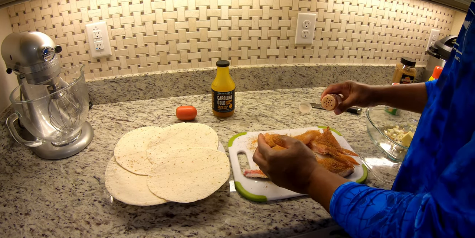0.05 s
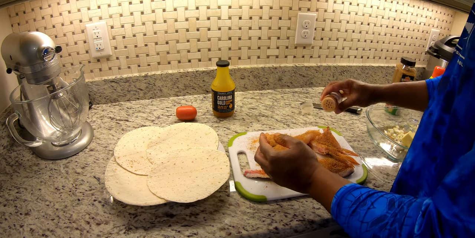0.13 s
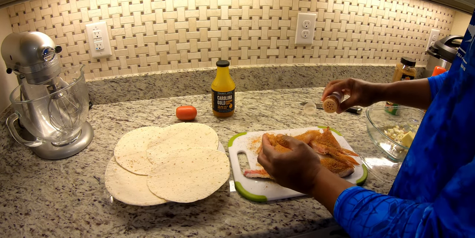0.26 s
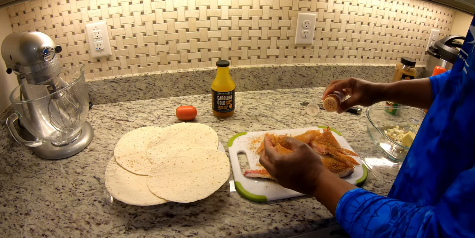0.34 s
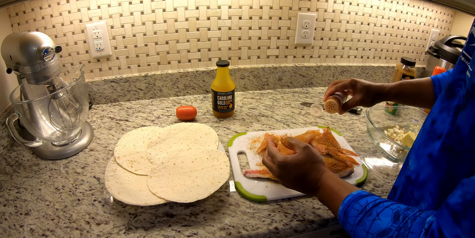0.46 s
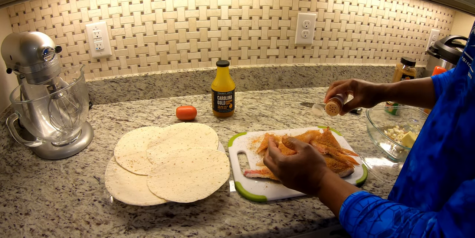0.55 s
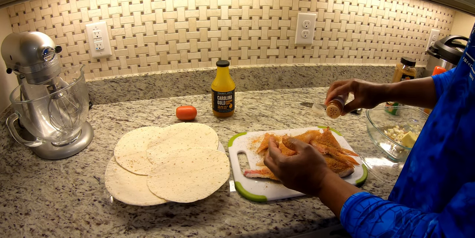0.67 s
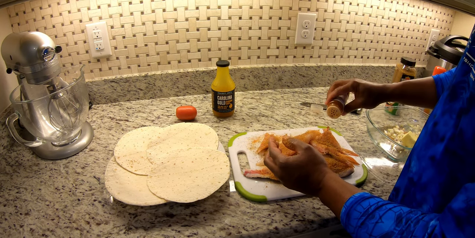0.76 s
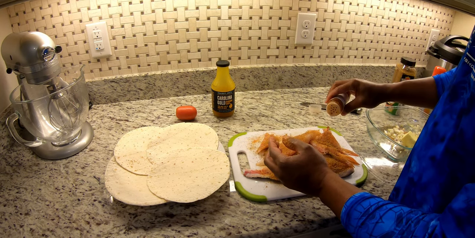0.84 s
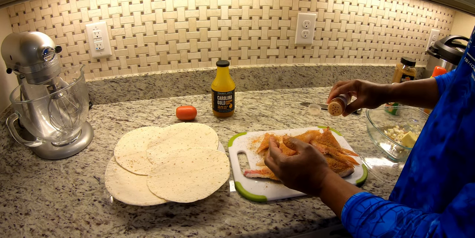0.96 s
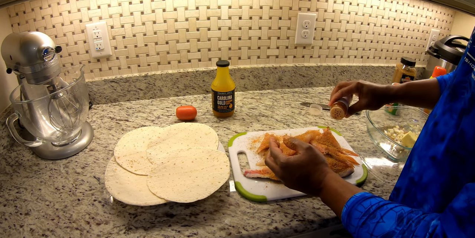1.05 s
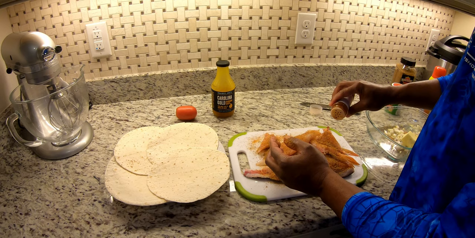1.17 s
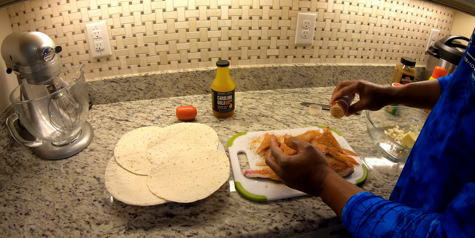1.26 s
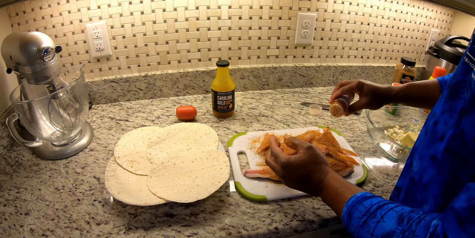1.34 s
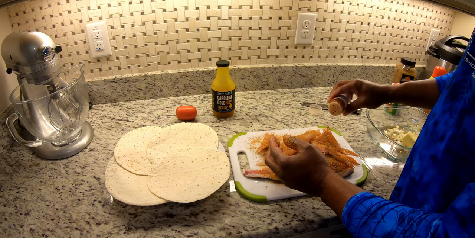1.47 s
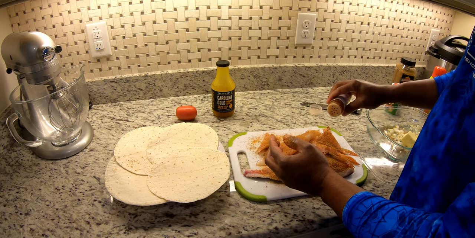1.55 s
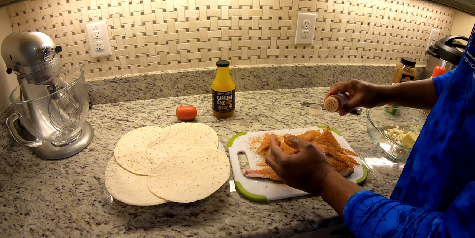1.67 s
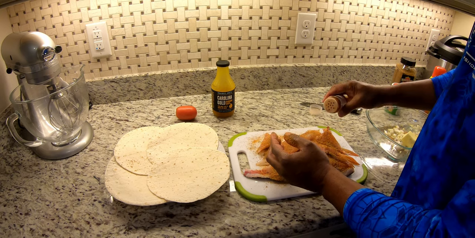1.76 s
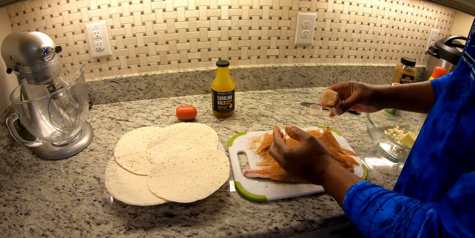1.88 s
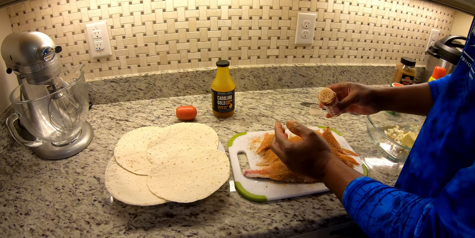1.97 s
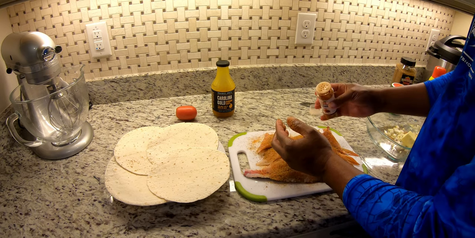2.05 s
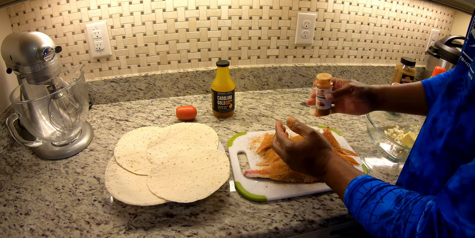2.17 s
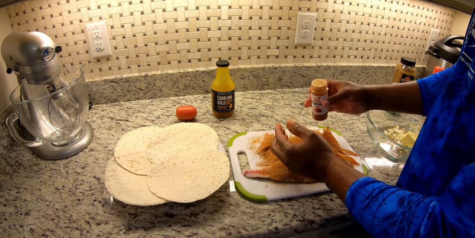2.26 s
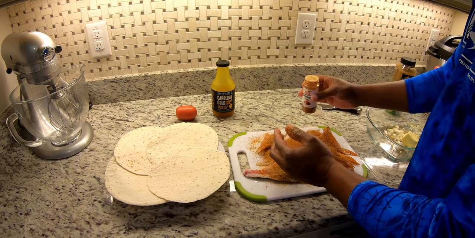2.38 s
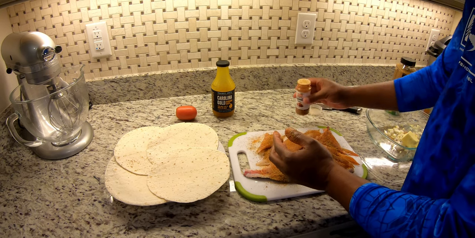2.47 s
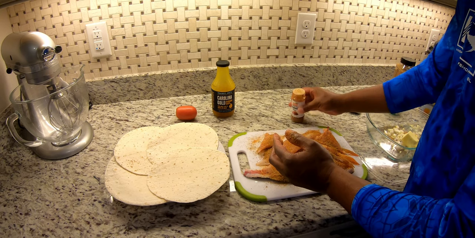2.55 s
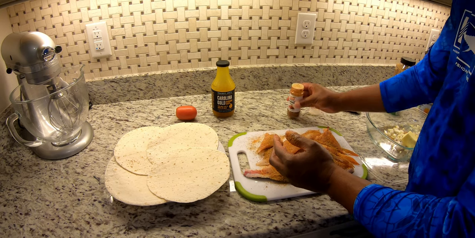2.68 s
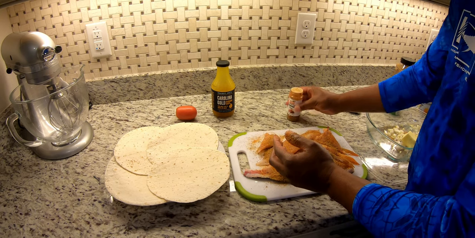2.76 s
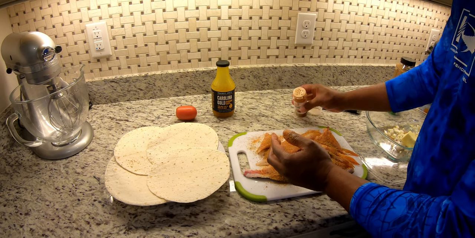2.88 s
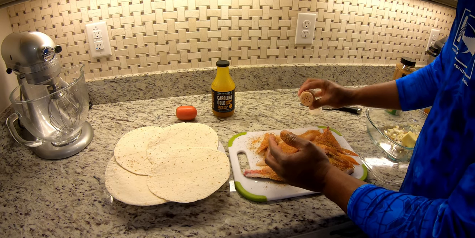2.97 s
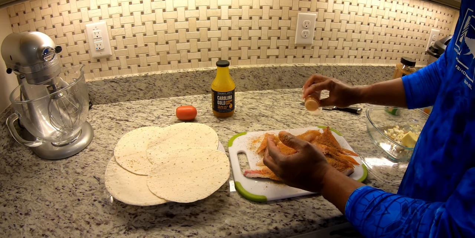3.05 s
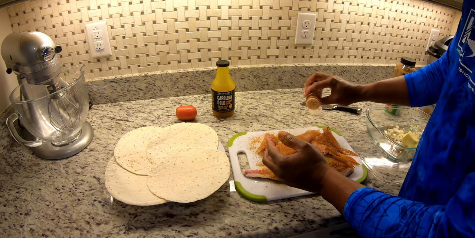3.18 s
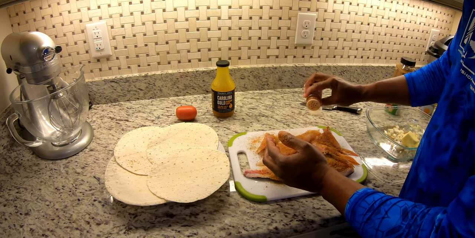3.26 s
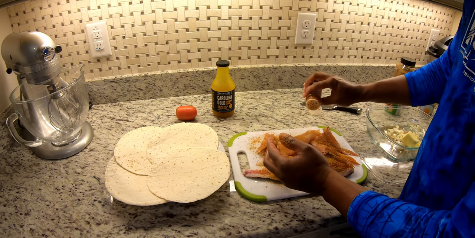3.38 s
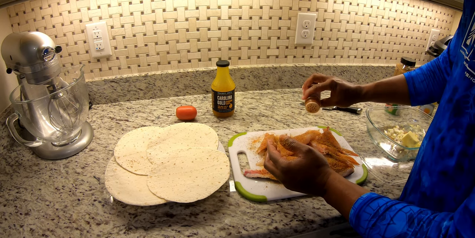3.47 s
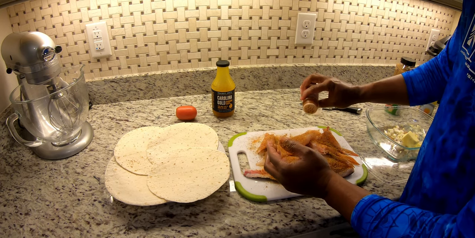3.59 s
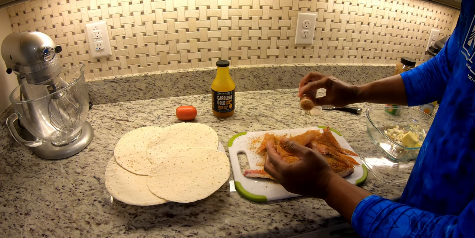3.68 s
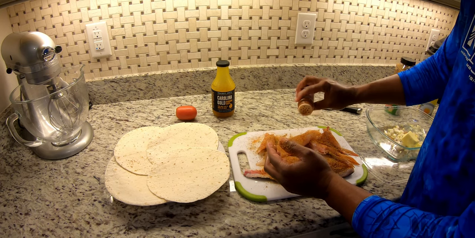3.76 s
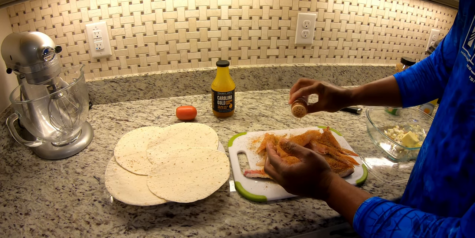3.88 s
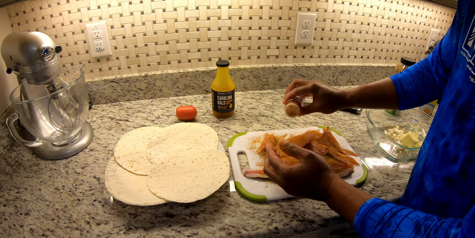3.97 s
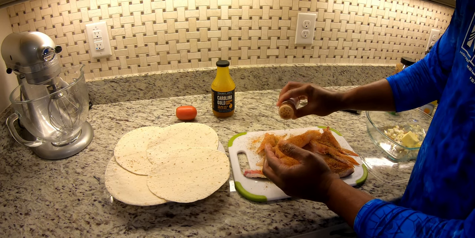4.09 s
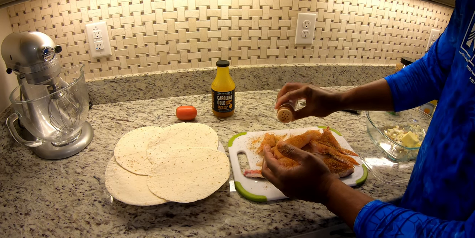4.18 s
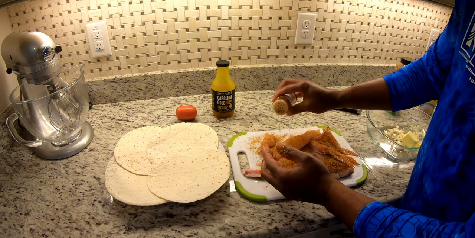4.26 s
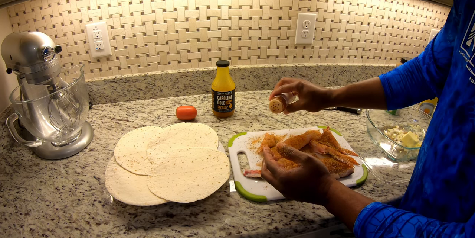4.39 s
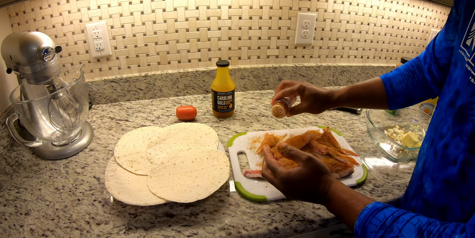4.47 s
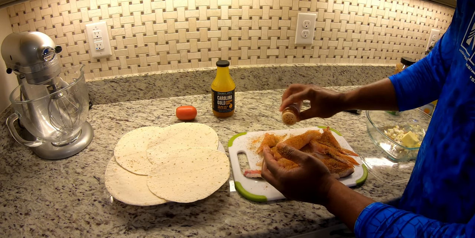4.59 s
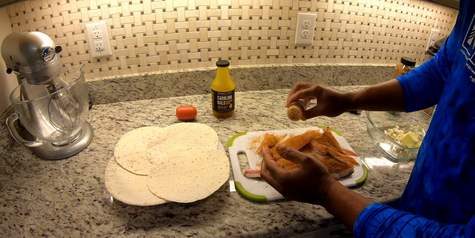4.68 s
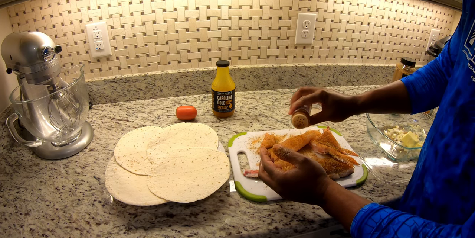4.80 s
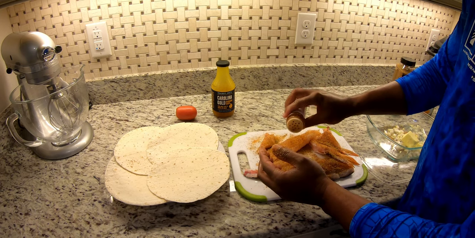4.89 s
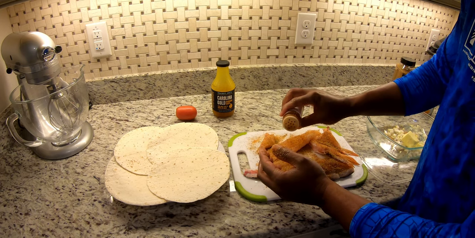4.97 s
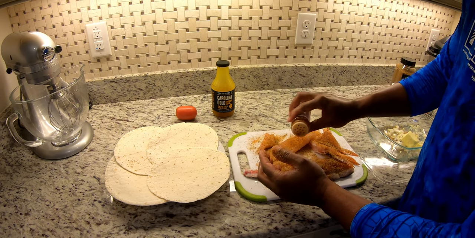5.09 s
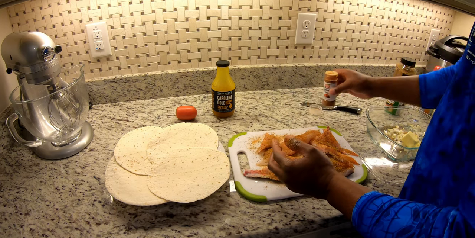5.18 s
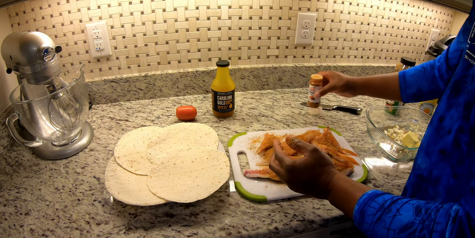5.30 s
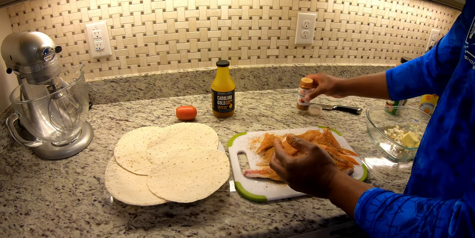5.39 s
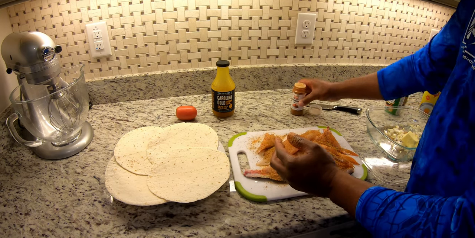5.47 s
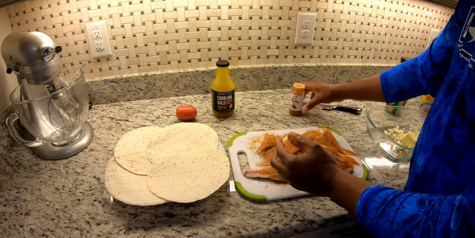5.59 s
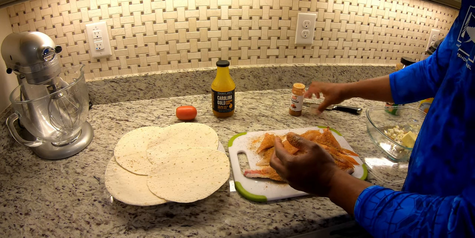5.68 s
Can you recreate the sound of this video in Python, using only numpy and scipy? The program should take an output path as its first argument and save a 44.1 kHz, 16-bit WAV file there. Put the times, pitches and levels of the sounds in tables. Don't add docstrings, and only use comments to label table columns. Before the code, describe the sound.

Close, dry rattling of coarse spice in a plastic bottle, about eight uneven strokes a second, fills the first second and a half. Near 2.6 seconds it knocks twice on stone. Only faint ticks, cloth swishes and fridge hum follow, until the level jumps, a dragged dish rings and the bottle is knocked down. Small tiled kitchen, short echo.

```python
import sys
import numpy as np
from scipy import signal
from scipy.io import wavfile

SR = 44100
rng = np.random.default_rng(int(sys.argv[2]) if len(sys.argv) > 2 else 0)


def unload_wav(signal):
    wavfile.write(
        sys.argv[1],
        SR,
        np.round(np.clip(np.atleast_2d(signal).T, -1, 1) * 32767).astype(np.int16),
    )


def elevation(decibels):
    levels = np.asarray(decibels, float)
    return 10 ** (levels / 20)


N = 253134
LEVEL_JUMP_S = 5.1748


def at_hz(points, hz):
    table = np.array(points)
    return np.interp(np.log(hz), np.log(table[:, 0]), table[:, 1])


def bands(length, shape):
    warm_up = 8000
    edges = 22 * 2 ** (np.arange(30) / 3)
    white = rng.standard_normal((2, length + warm_up))
    total = 0
    for k, (low, high) in enumerate(zip(edges, edges[1:])):
        band_filter = signal.butter(2, [low, high], "band", fs=SR, output="sos")
        band = signal.sosfilt(band_filter, white[k % 2])[warm_up:]
        total = total + shape(np.sqrt(low * high)) * band
    return total


def resonate(x, peaks):
    out = 0
    for k, (hz, width_hz, level_db) in enumerate(peaks):
        r = np.exp(-np.pi * width_hz / SR)
        top = elevation(level_db) * (-1) ** k * (1 - r * r) / 2
        out = out + signal.lfilter([top, 0, -top], [1, -2 * r * np.cos(2 * np.pi * hz / SR), r * r], x + 1e-18)
    return out


def ring(x, hz, t60):
    r, w = elevation(-60 / (t60 * SR)), 2 * np.pi * hz / SR
    return signal.lfilter([0, np.sin(w)], [1, -2 * r * np.cos(w), r * r], x + 1e-18)


def add(track, s, piece):
    at = round(s * SR)
    track[at:at + len(piece)] += piece[:N - at]


def burst(rise_ms, t60_ms):
    ms = np.arange(SR // 4) * 1000 / SR
    fall = elevation(-60 * np.maximum(ms - rise_ms, 0) / t60_ms)
    return np.minimum(ms / rise_ms, 1) * fall


def grains(per_s, spread_db):
    hit = rng.random(N) < per_s / SR
    size = elevation(spread_db * np.minimum(rng.exponential(1, N), 4))
    x = hit * size * rng.choice([-1, 1], N)
    return x / x.std()


# (frequency [Hz], level [dB])
AIR_COLOUR = [(40, -49.5), (60, -6.5), (270, -3), (700, -8.5), (1400, -19.5), (5000, -28.5), (11000, -30),
              (15500, -39.5)]
# (frequency [Hz], level [dB rms])
FRIDGE_HUM = [(53.8, -64), (107.7, -67.5), (161.4, -73.5)]


def room_tone():
    air_db, jump_db, notch_hz = -59, 17.5, 1383
    t = np.arange(N) / SR
    air = bands(N, lambda hz: elevation(at_hz(AIR_COLOUR, hz)))
    air = 0.4 * air + 0.64 * signal.lfilter(*signal.iirnotch(notch_hz, 5.0, fs=SR), air)
    hum = 0
    for hz, level_db in FRIDGE_HUM:
        hum = hum + np.sqrt(2) * elevation(level_db) * np.sin(2 * np.pi * hz * t + 6 * rng.random())
    jump = np.clip((t - LEVEL_JUMP_S) / 0.0011, 0, 1)
    return (elevation(air_db) * air / air.std() + hum) * elevation(jump_db * jump)


# (frequency [Hz], time to fall 60 dB [s])
ECHO_TIMES = [(100, 0.37), (260, 0.26), (700, 0.29), (1800, 0.28), (4800, 0.34), (9000, 0.37),
              (12500, 0.32), (16000, 0.26)]


def kitchen(x):
    late_t60_s, late_db = 0.95, -13
    t = np.arange(SR) / SR
    late = elevation(late_db - 60 * t / late_t60_s)

    def fade(hz):
        return elevation(-60 * t / at_hz(ECHO_TIMES, hz)) + late / (1 + (hz / 6000) ** 2) * (hz > 200)

    echo = bands(len(t), fade) * np.clip(t / 0.0015, 0, 1)
    return signal.fftconvolve(x, echo / np.sqrt(np.sum(echo ** 2)))[:N]


# (time [s], level [dB], frequency [Hz], time to fall 60 dB [s])
FAR_BUMPS = [(2.195, -43, 750, 0.025), (2.441, -42.5, 1880, 0.025), (2.443, -44, 2250, 0.022),
             (2.441, -44, 780, 0.042), (2.645, -37, 100.6, 0.6), (4.493, -42, 130, 0.056),
             (4.49, -53, 2250, 0.023), (4.495, -53, 2610, 0.02), (4.53, -61, 2400, 0.026),
             (4.53, -47.5, 660, 0.15), (4.53, -48.5, 136, 0.16), (4.548, -44, 200, 0.042)]


def bumps():
    out = np.zeros(N)
    for s, level_db, hz, t60 in FAR_BUMPS:
        tone = ring(signal.unit_impulse(SR // 4), hz, t60)
        add(out, s, elevation(level_db) * tone * burst(4.6, 900))
    return out


# (time [s], length [s], high swish level [dB], mid rustle level [dB])
SLEEVE_MOVES = [
    (1.62, 0.57, -69, -64),
    (2.08, 0.16, -57, -66),
    (2.23, 0.16, -58, -65.5),
    (2.421, 0.071, -66, -57),
    (3.14, 0.13, -60.5, -74),
    (3.67, .045, -59, -87),
    (3.727, .12, -61, -85),
    (5.16, 0.1, -62, -46.5),
    (5.21, 0.19, -42.5, -62),
    (5.3, .24, -53, -50),
]


def sleeve():
    rub, high, mid = grains(12000, 0.48), np.zeros(N), np.zeros(N)
    swish = resonate(rub, [(8500, 1300, -2), (11000, 3500, 0)])
    rustle = resonate(rub[::-1], [(2100, 2500, 0)])
    for s, length_s, swish_db, rustle_db in SLEEVE_MOVES:
        swell = np.hanning(round(length_s * SR))
        add(high, s, elevation(swish_db - 12.0) * swell)
        add(mid, s, elevation(rustle_db - 6) * swell)
    return swish / swish.std() * high + rustle / rustle.std() * mid


# (frequency [Hz], width [Hz], level [dB])
DISH_MODES = [(392, 26, -3.5), (572, 35, -1.5), (711, 22, -7), (780, 7.8, -2), (850, 27, -4.5),
              (990, 10.5, -1), (1103, 15, -9), (1195, 18, -10), (1334, 33, -10.5), (1548, 46, -17),
              (1820, 110, -22)]
# (time [s], upper tones level [dB], main ring level [dB])
DISH_RUB = [
    (5.179, -30, -17.5),
    (5.22, -34, -36.5),
    (5.298, -37.5, -27),
    (5.36, -47, -35.5),
    (5.4, -42.5, -33.5),
    (5.452, -48, -72),
    (5.476, -49.5, -54),
    (5.495, -66, -57),
]


def dish():
    main_hz = 488
    s, upper_db, ring_db = np.transpose(DISH_RUB)
    t, rub = np.arange(N) / SR, rng.standard_normal(N)
    upper = resonate(rub, DISH_MODES)
    upper = upper / upper.std() * elevation(np.interp(t, s, upper_db + 1, right=-90))
    main = np.sqrt(2) * np.sin(2 * np.pi * main_hz * t) * elevation(np.interp(t, s, ring_db - 5.0, right=-90))
    click, tone = signal.unit_impulse(SR // 4), 0
    for hz, level_db in [(491.0, -21.5), (610, -42), (420, -59)]:
        tone = tone + elevation(level_db) * ring(click, hz, 0.087)
    thud = np.zeros(N)
    add(thud, 5.1760, tone * burst(3.5, 420))
    return thud + (upper + main) * np.clip((t - LEVEL_JUMP_S) / 0.0018, 0, 1)


# (time [s], level [dB])
SETTLING_TICKS = [(2.308, -53), (2.3394, -55), (2.443, -42.5), (3.575, -58), (5.2245, -43), (5.2417, -34.5),
                  (5.283, -34), (5.325, -37), (5.51, -30), (5.5266, -24.5), (5.5356, -29), (5.542, -23),
                  (5.545, -29.5)]


def settling():
    envelope = np.zeros(N)
    for s, level_db in SETTLING_TICKS:
        add(envelope, s, elevation(level_db) * burst(rise_ms=2.1, t60_ms=27))
    return resonate(envelope * grains(9000, 4.0), [(6780, 2400, -2.5), (10500, 1800, -2.5), (13500, 3900, -10.5)])


# (time [s], level [dB], centre frequency [Hz])
LUMP_TICKS = [(.5722, -29, 8000), (0.5818, -19, 7600), (.7835, -22, 8200), (0.925, -30, 8500),
              (1.001, -36, 8000), (1.0895, -20.5, 8500), (1.164, -26, 6000), (1.4650, -25, 6400),
              (1.4957, -38, 7000), (1.5025, -48, 7000), (1.522, -31, 7500), (1.687, -49, 10500),
              (1.858, -46, 10000), (1.884, -44, 10500), (1.931, -50, 11000), (2.401, -45.5, 9800),
              (2.414, -48, 8500), (2.884, -28.5, 6500), (3.044, -38, 7500), (3.093, -45, 11500),
              (4.2725, -46, 11000), (4.391, -49, 9000), (4.724, -50, 8500)]


def ticks():
    out = np.zeros(N)
    for s, level_db, hz in LUMP_TICKS:
        add(out, s, elevation(level_db + 10.0) * resonate(signal.unit_impulse(400), [(hz, 0.21 * hz, 0)]))
    return out


# (time [s], level [dB])
TRICKLE_LEVEL = [
    (0.0, -56.5),
    (0.468, -62.5),
    (0.834, -59.5),
    (1.15, -63),
    (1.36, -57),
    (1.52, -71),
    (1.62, -80),
]


def trickle():
    s, level_db = np.transpose(TRICKLE_LEVEL)
    sing = resonate(grains(900, 4.5), [(2024, 130, 8), (2240, 40, 1), (3200, 1000, -13), (4700, 1200, -27)])
    return sing / sing.std() * elevation(np.interp(np.arange(N) / SR, s, level_db - 0.5, right=-120))


# (time [s], level [dB], contact cut-off [Hz], crack level [dB])
FIRST_KNOCKS = [
    (2.6144, -3, 2940, -2.5),
    (2.6196, -6.5, 1970, -17.5),
    (2.7718, -7.5, 3000, -2.5),
    (2.7772, -11, 1970, -20),
    (2.8730, -20, 350, -45),
    (2.8790, -26, 350, -45),
]
SET_DOWN = [
    (5.5103, 6.5, 1690, -21.5),
    (5.5152, -1, 1550, -42),
    (5.5362, -13, 1800, -40),
    (5.5430, -4, 900, -45),
]
# (frequency [Hz], level [dB], time to fall 60 dB [s])
COUNTER_MODES = [(94.44, 0, .08), (239, -9.5, 0.022), (395, -4, 0.0083), (508, 6.5, 0.022),
                 (654, 1.5, 0.047), (770, -7.5, 0.032), (1020, -7, 0.02), (1246, 0, 0.0072),
                 (1660, -11, 0.0099), (2030, 0, 0.012), (2290, -9, 0.0048), (2940, -3.5, 0.0051),
                 (3660, -5, 0.0087), (7260, -1.5, 0.011)]
# (frequency [Hz], level [dB], time to fall 60 dB [s])
COUNTER_EDGE_MODES = [(120, -12, 0.063), (247, -36, 0.076), (433, 7, 0.013), (507, -17, 0.066),
                      (670, -3.5, 0.056), (744, -8.5, 0.045), (1020, -4, 0.0081), (1230, -16, 0.016),
                      (1720, -11.5, 0.0097), (1976, -5, 0.018), (2124, -11, 0.023), (2440, -20, 0.013),
                      (3180, -11, 0.012), (4030, -38, 0.0036)]


def knocking(contacts, modes):
    near, far = np.zeros(N), np.zeros(N)
    edge = [(3448, 790, 0), (7650, 2150, -0.5), (12400, 5200, -11.5)]
    for s, level_db, cut_hz, crack_db in contacts:
        click = signal.unit_impulse(SR // 4)
        push = signal.lfilter(*signal.butter(1, cut_hz, fs=SR), click)
        push = signal.sosfilt(signal.butter(3, 185, "high", fs=SR, output="sos"), push)
        chance, body = rng.normal(0, 1.2, len(modes)), 0
        for (hz, mode_db, t60), chance_db in zip(modes, chance):
            body = body + elevation(mode_db + chance_db - 8) * ring(-push, hz, t60)
        crack = rng.standard_normal(SR // 4) * (burst(0.22, 3.8) + 0.3 * burst(1.5, 40))
        add(near, s, elevation(level_db) * (body + elevation(crack_db) * resonate(crack, edge)))
        add(far, s, elevation(level_db) * (body + elevation(crack_db + 16.5) * resonate(click, edge)))
    return near, far


# (time [s], spice level [dB], brightness [dB], rise [ms], fall by 60 dB [ms])
SPICE_THROWS = [(0.104, -22.5, 1, 2.1, 61), (.2255, -25.5, -8.5, 3.1, 57), (0.3473, -20, -0.5, 4, 55),
                (0.4601, -21.5, -5, 8.4, 41), (0.5586, -32.5, -9.5, 2.9, 96), (0.5787, -22, -6.5, 2, 34),
                (0.6632, -29.5, -4.5, 3.3, 86), (0.757, -26.5, -5, 3.6, 120), (0.847, -29.5, -10, 2.6, 74),
                (0.8588, -24.5, -4, 1.9, 106), (.9248, -30, -7, 2.4, 120), (1.0105, -30, -9.5, 4.3, 83),
                (1.0893, -24.5, -3, 2.2, 28), (1.165, -30.5, -3, 4.3, 17), (1.2207, -22, -4, 2.9, 48),
                (1.2827, -25.5, -7.5, 3.1, 49), (1.3321, -30, -4.5, 3.4, 80), (1.3837, -26, -7.5, 2.2, 71),
                (1.4235, -31.5, -5.5, 4.5, 78), (1.4646, -23.5, -2.5, 1.5, 49), (1.495, -28.5, -1, 2.2, 61)]
# (time [s], spice level [dB], brightness [dB])
SPICE_SLIDES = [(.0034, -39, -19), (.075, -35.5, -12.5), (.0965, -31.5, -24.5), (.1394, -35, -7.5),
                (.202, -34, -11.5), (.361, -28.5, -5.5), (.6752, -27.5, -6.5), (.7744, -30.5, -5),
                (.949, -32.5, -11), (.9905, -40, -10), (1.067, -46.5, -4), (1.1576, -34.5, -8),
                (1.2606, -39.5, -14), (1.518, -38, -9)]
# (time [s], share turned [0-1], grip lowering the wall tone [dB])
HOLD = [
    (0, 0.25, 2.5),
    (.25, 0.25, 3.5),
    (.33, 0.59, 0),
    (.8, 0.39, 0.9),
    (1.6, 0.68, 1.4),
]
# (frequency [Hz], width [Hz], level [dB])
SIDE_WALL = [(750, 77, -17.5), (1024, 65, -14), (1804, 260, -9), (1955, 140, -3.5)]
# (frequency [Hz], width [Hz], level [dB])
MAIN_WALL = [(2126, 150, 4), (2182, 136, 5.5), (2375, 227, -6.5), (2830, 260, -9)]
# (frequency [Hz], width [Hz], level [dB])
CAP_END = [(3320, 1750, 0.5), (5200, 2040, -2.5), (5750, 330, 4), (9750, 1220, -0.5), (12100, 4100, -14.5),
           (13800, 1200, -26)]
# (frequency [Hz], width [Hz], level [dB])
CAP_END_TURNED = [(3200, 140, -6), (4970, 900, 5.5), (5410, 560, 5), (7920, 950, -1.5), (9060, 800, 0),
                  (11500, 3700, -21), (14300, 3000, -14)]


def shaking():
    wall, rain, caps = np.zeros(N), grains(5000, 1.66), CAP_END + CAP_END_TURNED
    strokes = []
    for throw in SPICE_THROWS:
        strokes.append((*throw, -2 - 1.5 * throw[3]))
    for slide in SPICE_SLIDES:
        strokes.append((*slide, 7.7, 93, -2))
    cap = np.zeros((len(caps), N))
    spots = elevation(2.5 * rng.standard_normal((len(strokes), len(cap))))
    for (s, level_db, bright_db, rise_ms, t60_ms, lump_db), spot in zip(strokes, spots):
        hits = burst(rise_ms, t60_ms) * rain[round(s * SR):][:SR // 4]
        hits[0] += elevation(lump_db + 24.0)
        add(wall, s, elevation(level_db) * hits)
        for track, strength in zip(cap, spot):
            add(track, s, strength * elevation(level_db + bright_db) * hits)
    t = np.arange(N) / SR
    s, share, grip_db = np.transpose(HOLD)
    turned = np.clip(np.interp(t, s, share), 0, 1)
    grip = elevation(np.interp(t, s, grip_db))
    facing = [1 - turned] * len(CAP_END) + [turned] * len(CAP_END_TURNED)
    bright = 0
    for k, peak in enumerate(caps):
        bright = bright + (-1) ** k * resonate(cap[k] * facing[k], [peak])
    body = resonate(wall * grip, SIDE_WALL) + resonate(wall / grip, MAIN_WALL)
    return elevation(7.5) * body + elevation(-1.5) * bright


def scene():
    shake = shaking() + trickle() + ticks()
    fine = settling()
    first, first_far = knocking(FIRST_KNOCKS, COUNTER_MODES)
    last, last_far = knocking(SET_DOWN, COUNTER_EDGE_MODES)
    wet = kitchen(elevation(-10.5) * shake + elevation(-9.5) * first_far + elevation(-9.5) * last_far + elevation(-7) * fine)
    near = shake + fine + first + last
    return (near + wet + sleeve() + bumps() + dish() + room_tone())[None]


def top_cut(x):
    return signal.sosfilt(signal.butter(12, 16690, fs=SR, output="sos"), x)


def record(dry):
    counter_dip_hz, mic_low_hz, mic_high_hz = 334.2, 46, 16350
    x = 0.25 * dry + 0.71 * signal.lfilter(*signal.iirnotch(counter_dip_hz, 6.0, fs=SR), dry)
    x = 1.12 * np.tanh(x / 1.217)
    x = signal.sosfilt(signal.butter(4, mic_low_hz, "high", fs=SR, output="sos"), x)
    x = signal.sosfilt(signal.cheby2(18, 60, mic_high_hz, fs=SR, output="sos"), x)
    return top_cut(x)


dry = scene()
out = record(dry)
unload_wav(out)
```